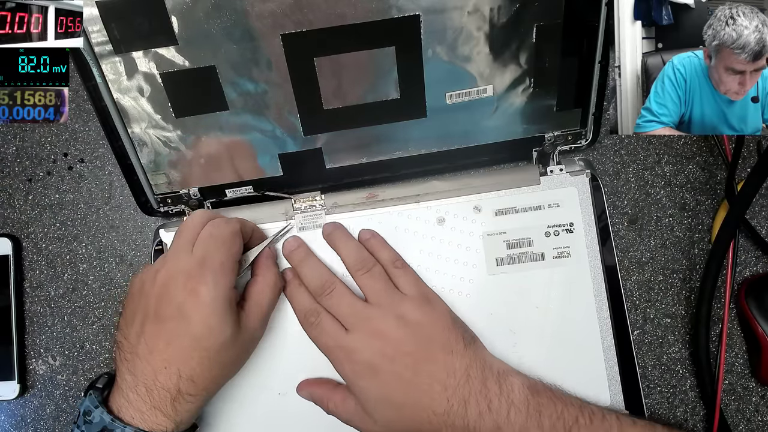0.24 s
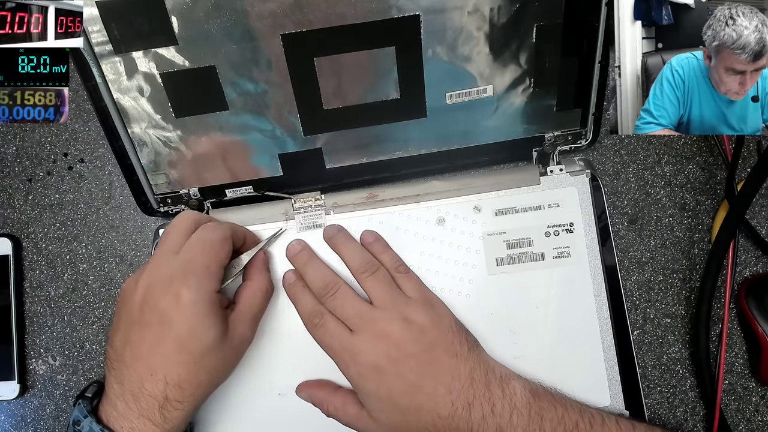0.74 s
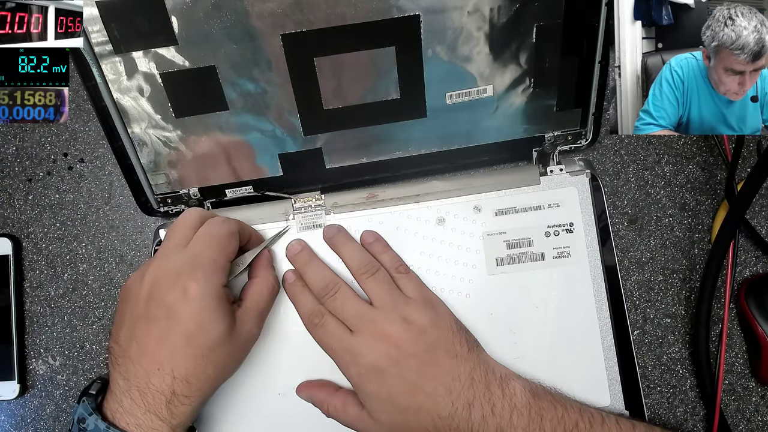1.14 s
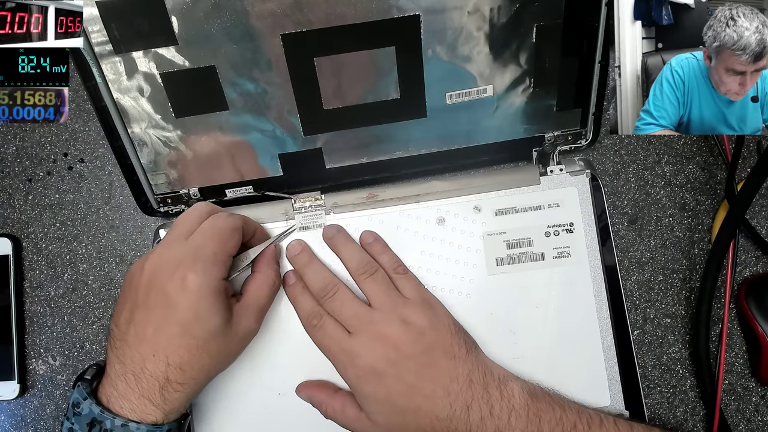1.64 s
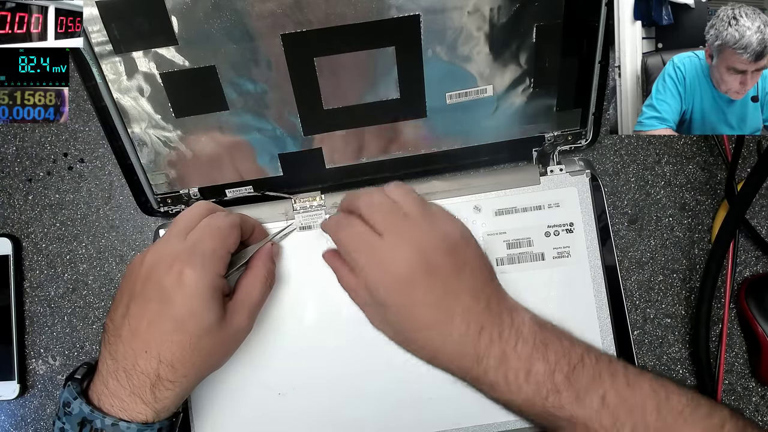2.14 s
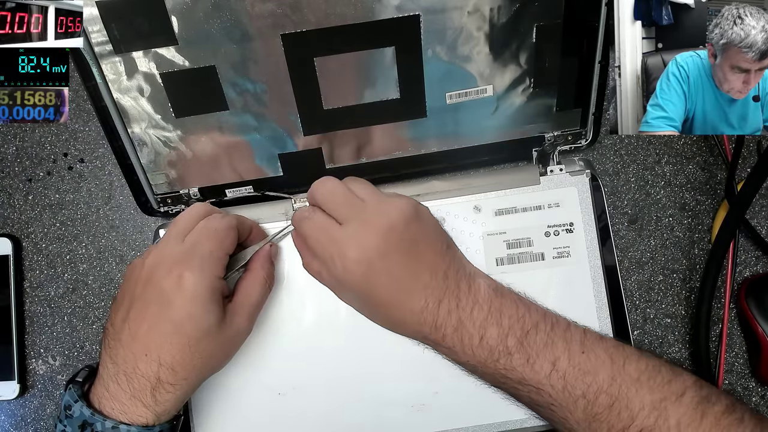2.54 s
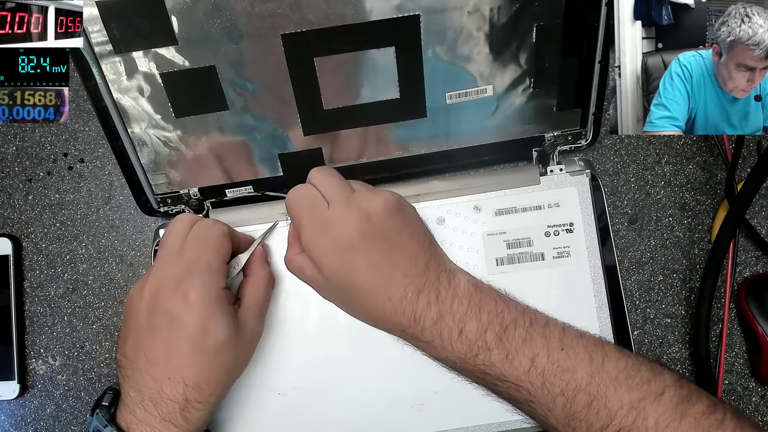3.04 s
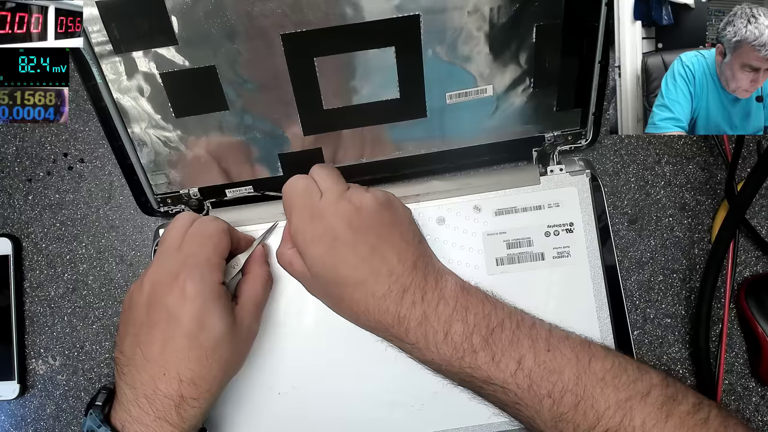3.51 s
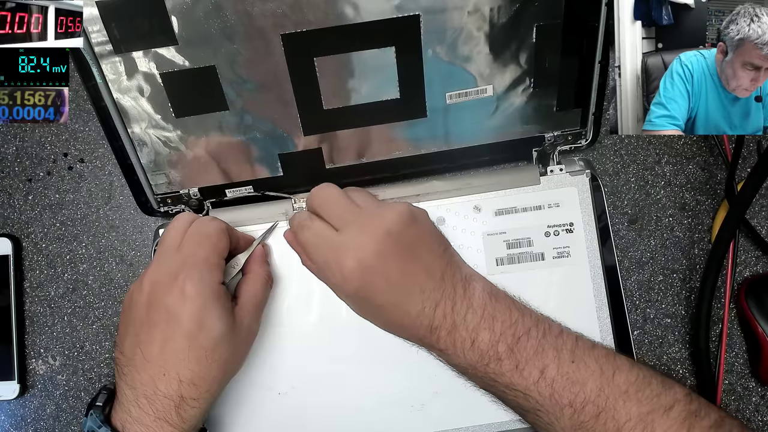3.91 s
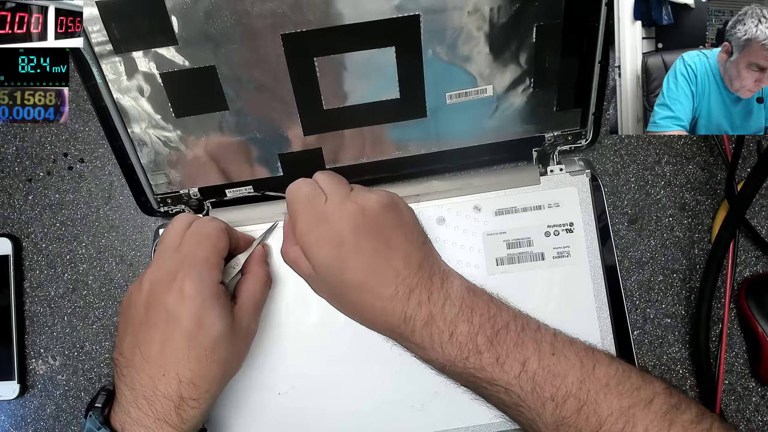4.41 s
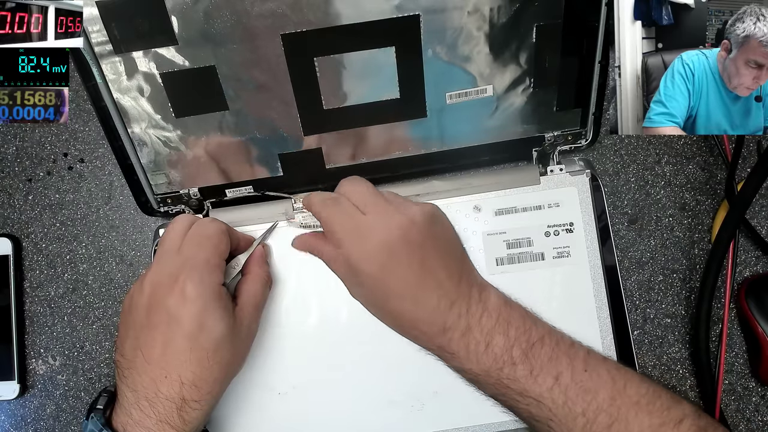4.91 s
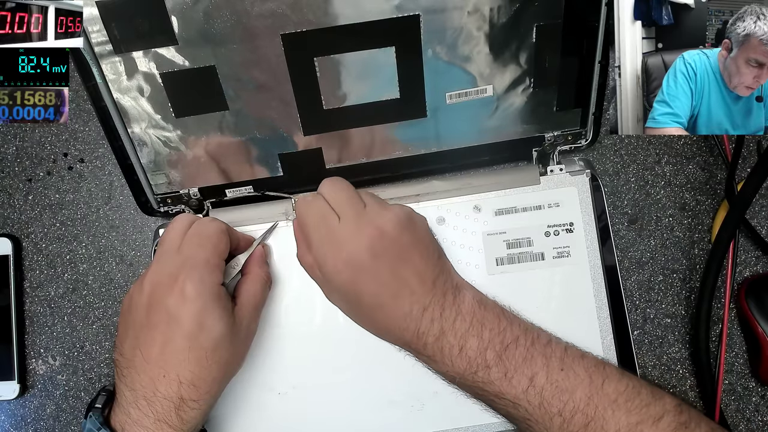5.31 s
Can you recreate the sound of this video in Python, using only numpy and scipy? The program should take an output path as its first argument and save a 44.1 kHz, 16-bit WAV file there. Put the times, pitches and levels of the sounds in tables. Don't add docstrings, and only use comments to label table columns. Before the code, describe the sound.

Close stereo pickup at a repair bench in a small room. Almost at once steel tweezers snap very loudly, rebound and land on a thin panel within a tenth of a second, with a very faint creak afterward. Quiet hiss follows. A barely audible tap comes mid-scene, then a bright springy slip-off click just after three seconds, nearly imperceptible cable ticks, and a softer metallic press right at the end.

```python
import sys
import numpy as np
from scipy import signal
from scipy.fft import rfft, irfft, next_fast_len
from scipy.io import wavfile

SR = 44100
rng = np.random.default_rng(int(sys.argv[2]) if len(sys.argv) > 2 else 0)


def gain_from_decibels(decibels):
    exponent = np.asarray(decibels, float) / 20
    return 10 ** exponent


def wav_record(signal):
    frames = np.transpose(np.atleast_2d(signal))
    bounded = np.clip(frames, -1, 1)
    quanta = np.round(bounded * 32767).astype(np.int16)
    wavfile.write(sys.argv[1], SR, quanta)


N = 245449

# start in seconds, peak in dB, contact rise in ms, bench scatter in dB, room in dB.
CONTACTS = [
    (0.1921, 6, 0.13, -15.5, -34.5),
    (.2680, 1, 0.23, -29, -37),
    (0.285, -5.5, 0.27, -24.5, -40.5),
    (2.5100, -51, 2, -77, -74),
    (2.5590, -56, 2, -62, -62),
    (2.5764, -33, 0.1, -46, -57.5),
    (3.1806, -10.5, 0.22, -22, -32),
    (5.4913, -16, 0.66, -29, -36.5),
]
# frequency in Hz, ring T60 in ms, level in dB.
SNAP_MODES = [(500, 18, -34), (950, 15, -26), (1250, 10, -30.5), (1820, 16, -25.5), (3510, 3, -9),
              (4030, 8, -1.5), (4500, 8, -2), (5836, 6, 4.5), (6470, 9.9, -0.5), (7810, 6.3, -4),
              (8430, 11, -12.5), (9840, 4.7, -17.5), (11200, 8, -33), (14800, 4, -21.5)]
# frequency in Hz, ring T60 in ms, level in dB.
REBOUND_MODES = [(480, 42, -49), (2030, 2.6, -34.5), (3900, 8, -15), (4470, 7.6, -7), (4400, 4.1, -7.5),
                 (5600, 1.7, 0), (6430, 2.3, 2.5), (7600, 2.9, 0.5), (8100, 3.5, -4.5), (9670, 5, -23),
                 (10600, 5.1, -18), (12300, 2.5, -22), (14880, 5, -24.5)]
# frequency in Hz, ring T60 in ms, level in dB.
LANDING_MODES = [(480, 45, -32), (960, 50, -23.5), (1330, 10, -21.5), (1800, 21, -20), (2980, 17, -22),
                 (3500, 17, -30), (4100, 14, -3), (4630, 8.4, -5.5), (5055, 5.3, 4.5), (5740, 5.2, 5.5),
                 (6400, 6.4, 0.5), (7050, 7, 4), (7960, 8.3, -1.5), (10600, 5.4, -15)]
# frequency in Hz, ring T60 in ms, level in dB.
BRUSH_MODES = [(5230, 26, 1.5), (5900, 20, 1)]
# frequency in Hz, ring T60 in ms, level in dB.
GRAZE_MODES = [(8600, 19, 0), (9500, 20, 0.0051)]
# frequency in Hz, ring T60 in ms, level in dB.
TAP_MODES = [(450, 22, -16), (1000, 6.6, -8.5), (1890, 9.1, -15), (2800, 3, -16), (3400, 3, -16),
             (4150, 9, -1.5), (4600, 9.1, 0.5), (5450, 4.5, 0), (6200, 5, -3), (7700, 3, -1),
             (9900, 6.9, 0), (10500, 8, -11)]
# frequency in Hz, ring T60 in ms, level in dB.
SLIP_OFF_MODES = [(520, 20, -14), (1000, 15, -19), (3030, 50, -18), (3530, 50, -12), (4560, 50, -6),
                  (5440, 50, -11), (6000, 55, 0), (6730, 50, 1), (7650, 60, 0), (8000, 45, 0),
                  (8290, 35, 0), (9130, 30, -6), (10160, 18, -15), (11800, 6, -26)]
# frequency in Hz, ring T60 in ms, level in dB.
PRESS_MODES = [(510, 35, -21), (1000, 4, -22), (2200, 8, -30), (3090, 50, -12), (3720, 55, -19),
               (4050, 50, -18), (4980, 40, -7), (5230, 45, -2), (5650, 40, -3), (6180, 45, -1),
               (6910, 45, -4), (7300, 40, -9), (8150, 25, -17), (10600, 10, -20)]
# frequency in Hz, gain in dB.
RETURN_COLOUR = [(200, -7.5), (500, 11.5), (1000, 11), (2000, 9), (3500, 4), (8000, -4.5), (11800, 6),
                 (12800, -8)]
# start in seconds, peak in dB.
CABLE_TICKS = [(2.752, -57), (3.307, -51), (3.331, -62), (3.361, -51.5), (3.382, -64), (3.456, -57.5),
               (5.552, -51)]
# frequency in Hz, density in dB per Hz.
TICK_TAIL_COLOUR = [(500, -15), (1000, -11.5), (3000, 11.5), (7000, 8.5), (11000, -22)]
# start in seconds, hold in seconds, level in dB.
BENCH_LEANS = [(-.04, 0.012, -39), (.13, 0.13, -39.5), (.31, 0.027, -47.5), (.44, 0.09, -42),
               (1.53, 0.012, -59), (2.52, 0.009, -53), (3.18, 0.024, -54), (4.05, .01, -61),
               (4.74, 0.011, -61.5), (5.46, .03, -53.5)]
# start in seconds, hold in seconds, level in dB.
HAND_SLIDES = [(-.1, 0.36, -71), (2.4, 0.35, -69), (3.2, 0.14, -69)]
# start in seconds, hold in seconds, level in dB.
CREAK_SLIPS = [(.335, 0.011, -61.5), (.43, .01, -71), (.475, .03, -65), (.54, .01, -73), (.6, 0.02, -70)]
# frequency in Hz, density in dB per Hz.
HISS_COLOUR = [(12, -31), (20, -3), (44, -10), (203, -19), (588, -28.5), (2660, -32.5), (14600, -25),
               (15900, -25)]
# frequency in Hz, side minus mid in dB.
HISS_WIDTH = [(60, -3), (380, -4.5), (2380, -3), (4400, -1), (8120, -10), (15000, -21.5)]

BOUNCE_MS, BOUNCE_SHARE, BOUNCE_GONE_MS = 0.55, 0.56, 0.33
NEAR_T60_S, ROOM_T60_S, CLUTTER_HZ = 0.038, 0.18, 2200
SMEAR_OCTAVES, BETWEEN_DB = 0.14, -22.5
PORT_LAG_MS, TREBLE_HZ, TREBLE_LAG_SHARE, EVEN_HZ = 0.044, 7826, 0.55, 11500
SWAY_HZ, SWAY_REST_DB, LEAN_ATTACK_S, LEAN_RELEASE_DB_S = 15.5, -67.5, 0.032, 240
SLIDE_ATTACK_S, SLIDE_RELEASE_DB_S = 0.12, 72
SLIP_ATTACK_S, SLIP_RELEASE_DB_S = 0.012, 260
CREAK_HZ, CREAK_AT_S, CREAK_RISE_HZ_S = 392, 0.35, 95
PARTNER_RATIO, PARTNER_DB = 1.36, -10
HISS_DB = -61
TOP_HZ, FADE_S = 15950, 0.003
MID_SIDE = np.array([[1], [-1]])


def tweezers():
    out = np.zeros((2, N))
    struck = (SNAP_MODES, REBOUND_MODES, LANDING_MODES, BRUSH_MODES,
              GRAZE_MODES, TAP_MODES, SLIP_OFF_MODES, PRESS_MODES)
    for (start_s, peak_db, rise_ms, near_db, room_db), modes in zip(CONTACTS, struck):
        bounce = BOUNCE_SHARE * max(1 - rise_ms / BOUNCE_GONE_MS, 0)
        add(out, start_s, gain_from_decibels(peak_db) * ring(modes, rise_ms, bounce))
        add(out, start_s, scatter(echo_colour(modes), rise_ms, near_db, room_db))
    return out


def ring(modes, rise_ms, bounce):
    hz, t60_ms, db = np.array(modes, float).T[:, :, None]
    sign = (-1.0) ** np.arange(len(hz))[:, None]
    rise_ms = np.maximum(rise_ms, 300 / hz)

    def heard(delay_ms):
        ms = np.maximum(np.arange(4096) * 1000 / SR - delay_ms, 0)
        swell = 1 - np.exp(-(ms / rise_ms) ** 2)
        decay = gain_from_decibels(db - 60 * ms / t60_ms)
        return np.sum(sign * swell * decay * np.sin(2 * np.pi * hz * ms / 1000), axis=0)

    both = ports(heard(0) + bounce * heard(BOUNCE_MS))
    return both / np.abs(both).max()


def scatter(tail, rise_ms, near_db, room_db):
    t = np.arange(SR // 8 * 2) / SR
    clutter = shaped(lambda hz: gain_from_decibels(colour(tail, hz)) / (1 + (CLUTTER_HZ / hz) ** 2), len(t))
    mid = shaped(lambda hz: gain_from_decibels(colour(tail, hz)), len(t))
    side = shaped(lambda hz: gain_from_decibels(colour(tail, hz)), len(t))
    near = ports(clutter) * gain_from_decibels(near_db - 60 * t / NEAR_T60_S)
    late = (mid + 0.61 * side * MID_SIDE) * gain_from_decibels(room_db - 60 * t / ROOM_T60_S)
    near_swell = np.clip(1000 * t / (rise_ms + 0.9), 0, 1) ** 2
    late_swell = np.clip(t / 0.008, 0, 1)
    return near * near_swell + late * late_swell


def echo_colour(modes):
    centre_hz, t60_ms, db = np.array(modes, float).T[:, :, None]
    energy = gain_from_decibels(db) ** 2 * t60_ms
    hz = np.geomspace(100, SR / 2, 400)
    close = hump(hz, centre_hz, SMEAR_OCTAVES) ** 2
    between = gain_from_decibels(BETWEEN_DB) ** 2 * hump(hz, centre_hz, 0.7) ** 2
    power = np.sum(energy * (close + between), axis=0)
    return list(zip(hz, 10 * np.log10(power + 1e-12) + colour(RETURN_COLOUR, hz)))


def ports(x):
    hz = np.arange(len(x) // 2 + 1) * SR / len(x)
    share = 1 - (1 - TREBLE_LAG_SHARE) / (1 + (TREBLE_HZ / (hz + 1)) ** 20)
    share = share / (1 + (hz / EVEN_HZ) ** 10)
    lag = np.exp(-2j * np.pi * hz * share * PORT_LAG_MS / 1000)
    return np.array([x, irfft(rfft(x) * lag, len(x))])


def cable():
    out = np.zeros((2, N))
    for start_s, peak_db in CABLE_TICKS:
        modes = [(hz, 6, 0) for hz in np.sort(900 * 2 ** (3.2 * rng.random(8)))]
        add(out, start_s, gain_from_decibels(peak_db - 2.5) * ring(modes, 0.22, 0.34))
        add(out, start_s, scatter(TICK_TAIL_COLOUR, 0.21, peak_db - 10, peak_db - 15.5))
    return out


def bench(t):
    rub = hand_rub(t)
    return bench_sway(t) + joint_creak(t) + rub[0] + 0.43 * rub[1:]


def bench_sway(t):
    loose = shaped(lambda hz: hump(hz, 13, 0.65) + 0.0472 * hump(hz, 65.2, 0.8))
    lean = effort(BENCH_LEANS, t, LEAN_ATTACK_S, LEAN_RELEASE_DB_S)
    rocking = 0.87 * np.sin(2 * np.pi * SWAY_HZ * t) + 0.47 * loose
    return lean * rocking + gain_from_decibels(SWAY_REST_DB) * loose


def joint_creak(t):
    wander = shaped(lambda hz: hump(hz, 25, 0.8))
    pitch_hz = CREAK_HZ + CREAK_RISE_HZ_S * (t - CREAK_AT_S) + 6 * wander
    phase = 2 * np.pi * np.cumsum(pitch_hz) / SR
    slip = effort(CREAK_SLIPS, t, SLIP_ATTACK_S, SLIP_RELEASE_DB_S) * (1 + 0.56 * wander)
    tight = np.clip((t - CREAK_AT_S) / 0.25, 0, 1)
    partner = gain_from_decibels(PARTNER_DB) * tight * np.sin(PARTNER_RATIO * phase)
    return np.sqrt(2) * slip * (np.sin(phase) + partner)


def hand_rub(t):
    slide = effort(HAND_SLIDES, t, SLIDE_ATTACK_S, SLIDE_RELEASE_DB_S)
    noise = np.array([shaped(lambda hz: hump(hz, 400, 0.63)) for _ in range(3)])
    return slide * gain_from_decibels(-4.5) * noise


def effort(rows, t, attack_s, release_db_s):
    start_s, hold_s, db = np.array(rows, float).T[:, :, None]
    rise = np.sin(np.pi / 2 * np.clip((t - start_s) / attack_s, 0, 1)) ** 2
    fall = gain_from_decibels(db - release_db_s * np.maximum(t - start_s - attack_s - hold_s, 0))
    return np.sqrt(np.sum((rise * fall) ** 2, axis=0))


def hiss():
    def mid_gain(hz):
        return gain_from_decibels(colour(HISS_COLOUR, hz))

    def side_gain(hz):
        return gain_from_decibels(colour(HISS_COLOUR, hz) + colour(HISS_WIDTH, hz))

    grid_hz = np.arange(1, SR // 2)
    side_share = np.sqrt(np.sum(side_gain(grid_hz) ** 2) / np.sum(mid_gain(grid_hz) ** 2))
    mid, side = shaped(mid_gain), shaped(side_gain)
    return gain_from_decibels(HISS_DB) * (mid + side_share * side * MID_SIDE)


def shaped(gain, count=N):
    size = next_fast_len(count)
    hz = np.maximum(np.arange(size // 2 + 1) * SR / size, 1)
    x = irfft(rfft(rng.standard_normal(size)) * gain(hz), size)[:count]
    return x / x.std()


def hump(hz, centre_hz, octaves):
    return np.exp(-0.5 * (np.log2(hz / centre_hz) / octaves) ** 2)


def colour(rows, hz):
    row_hz, row_db = np.array(rows, float).T
    return np.interp(np.log(hz), np.log(row_hz), row_db)


def add(out, start_s, sound):
    i = int(start_s * SR)
    out[:, i:i + sound.shape[1]] += sound[:, :N - i]


def scene():
    return tweezers() + cable() + bench(np.arange(N) / SR) + hiss()


def top_cut(x):
    return signal.sosfilt(signal.butter(12, 16870, fs=SR, output="sos"), x)


def record(dry):
    low_pass = signal.ellip(10, 0.2, 60, TOP_HZ, fs=SR, output="sos")
    band = signal.sosfilt(low_pass, dry)
    fade = np.clip((N - np.arange(N)) / (FADE_S * SR), 0, 1)
    return top_cut(np.clip(band, -1, 1) * fade)


dry = scene()
out = record(dry)
wav_record(out)
```